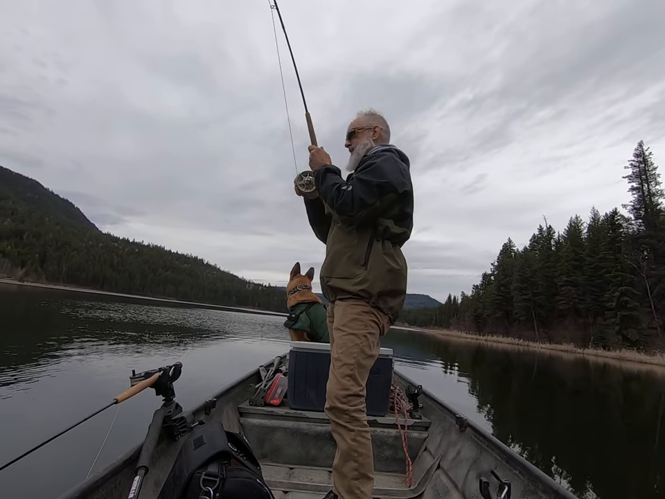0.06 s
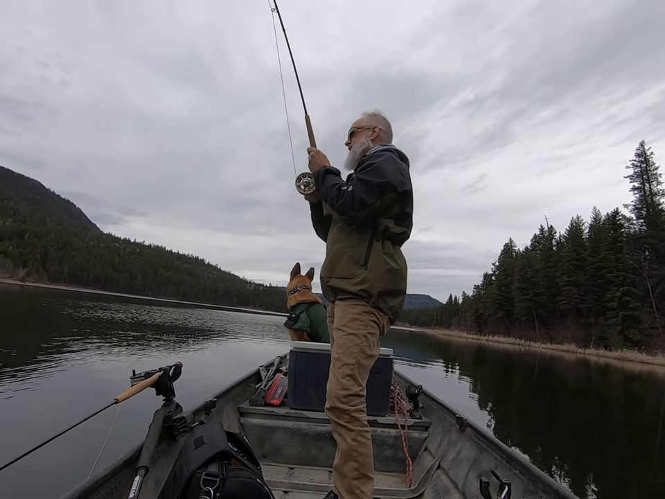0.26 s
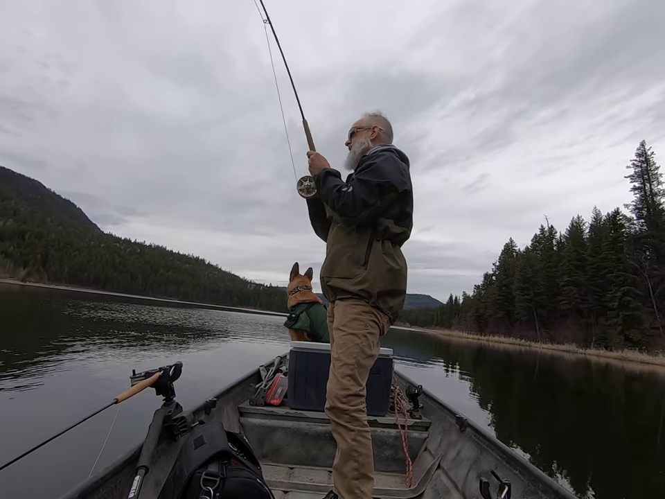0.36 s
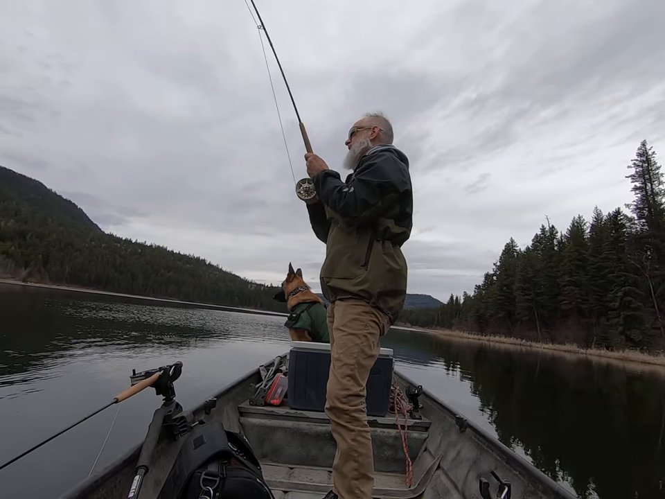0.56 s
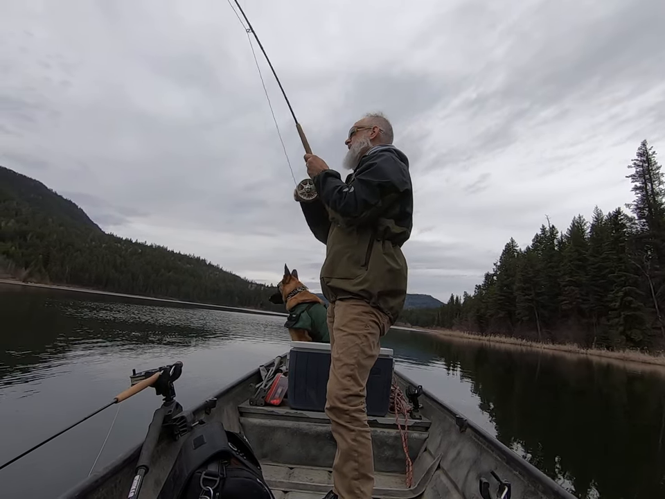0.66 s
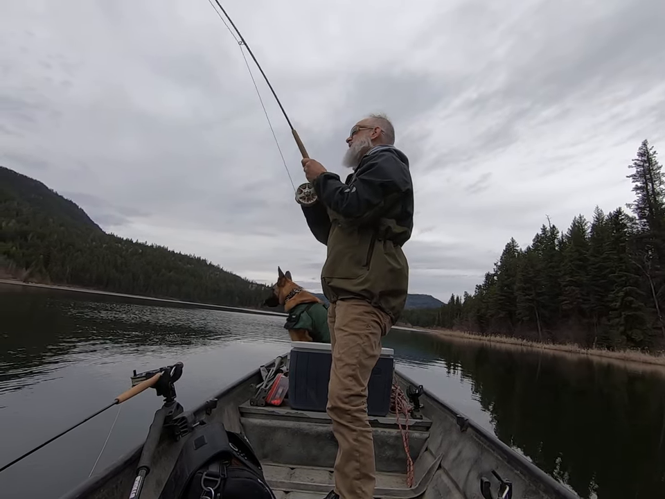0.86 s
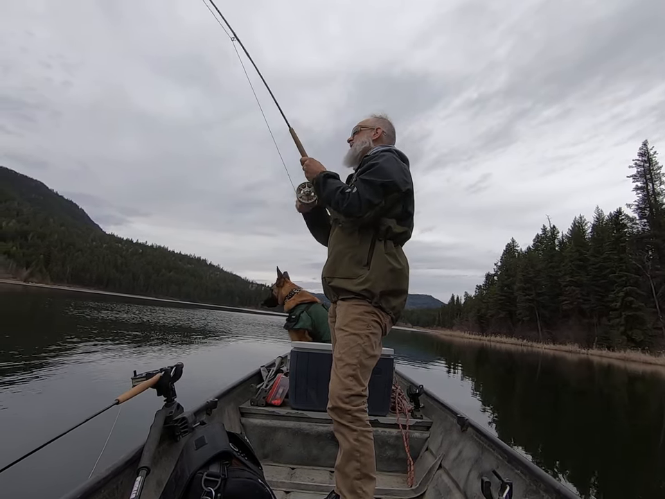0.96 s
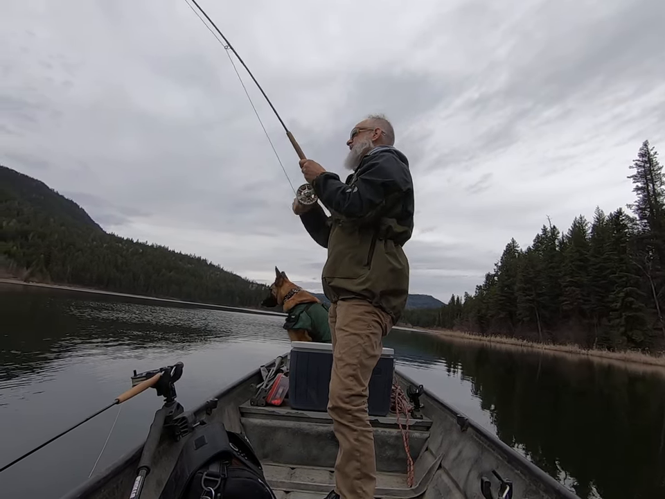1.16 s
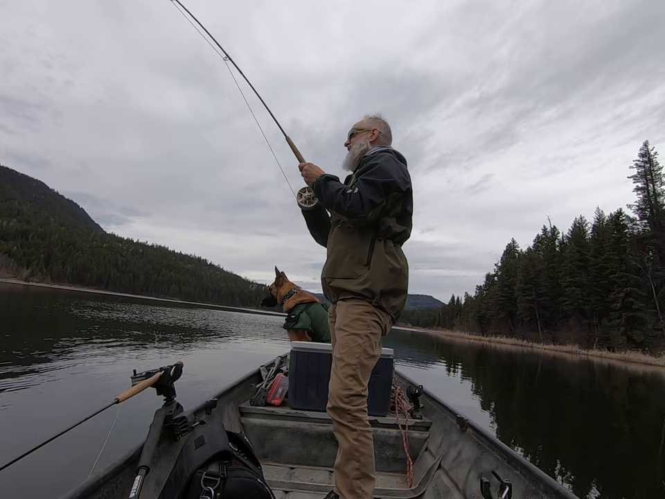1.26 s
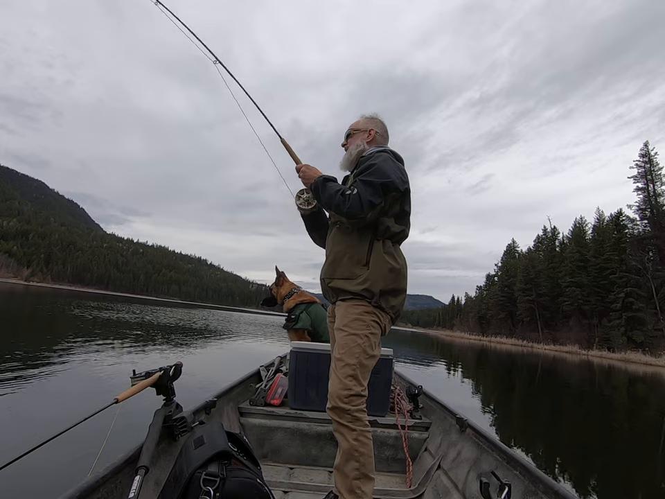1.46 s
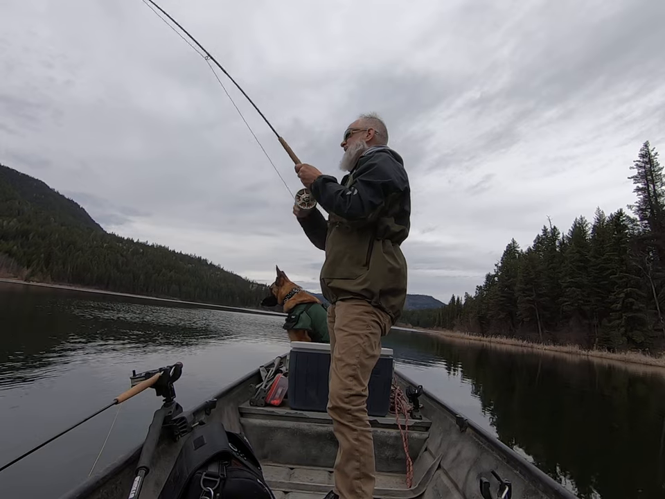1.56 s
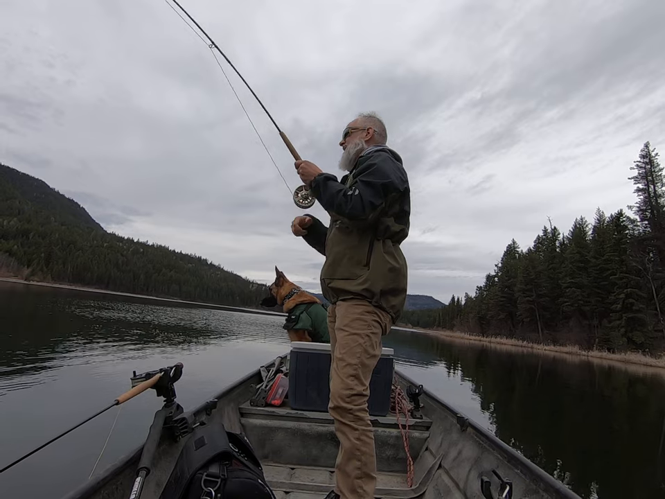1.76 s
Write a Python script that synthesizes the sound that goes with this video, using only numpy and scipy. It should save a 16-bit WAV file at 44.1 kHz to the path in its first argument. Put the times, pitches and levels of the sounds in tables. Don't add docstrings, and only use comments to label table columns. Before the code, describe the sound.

A fishing reel's click drag ratchets fast as line is pulled out on a calm lake

```python
import sys
import numpy as np
from scipy import signal
from scipy.io import wavfile
from scipy.ndimage import uniform_filter1d

SR = 44100
rng = np.random.default_rng(int(sys.argv[2]) if len(sys.argv) > 2 else 0)


def digitize_waveform(pressure):
    field = np.atleast_2d(pressure).T
    bounded = np.clip(field, -1, 1)
    quanta = np.round(bounded * 32767).astype(np.int16)
    wavfile.write(sys.argv[1], SR, quanta)


def makeup_ratio(level_db):
    decades = np.asarray(level_db, float) / 20
    return 10 ** decades


N = 79380
START_S, STOP_S = .2136, 1.546
DRIFT = .022
NO_SWELL_S = 1e-6

# start in
# seconds, level in dB against a full click, extra level of the ring in dB.
LONE_TICKS = [(.0092, -2, 0), (.0155, -14, -20), (.033, -28, -5), (.1205, -38, 10), (0.1255, -25, 0),
              (0.1445, -15, -6), (0.1597, -9, 0), (.163, -22, 8), (.18, -32, 14), (0.2, -32, 14),
              (1.387, 4.5, -5), (1.6605, -25.5, -11)]


def evened(x):
    return x / np.sqrt(np.mean(x ** 2) + 1e-20)


def follow(points, at, **ends):
    return np.interp(at, *np.transpose(points), **ends)


def read(points, hz):
    f, value = np.transpose(points)
    return np.interp(np.log(hz + 1), np.log(f + 1), value)


def band(x, low_hz, high_hz):
    edges = [low_hz, min(high_hz, .49 * SR)]
    return signal.sosfilt(signal.butter(3, edges, "band", fs=SR, output="sos"), x)


def train(times, sizes):
    out = np.zeros(N, complex)
    np.add.at(out, np.clip(np.round(times * SR).astype(int), 0, N - 1), sizes)
    return out


def ring(x, hz, t60):
    return signal.lfilter([1], [1, -np.exp((2j * np.pi * hz - np.log(1000) / t60) / SR)], x)


def resonate(x, hz, width_hz):
    turn = np.exp(2j * np.pi * np.cumsum(hz * np.ones(N)) / SR)
    r = np.exp(-np.pi * width_hz / SR)
    return 2 * (turn * signal.lfilter([(1 - r) ** 2], [1, -2 * r, r * r], x / turn)).real


def lake():
    # frequency in Hz, level in dB per Hz.
    murmur_colour = [(20, -30), (40, -1), (100, -30.5), (250, -7), (1100, -7), (3800, -12), (8000, -21),
                     (14300, -27)]
    # centre in Hz, width in Hz, level in dB.
    hull_hum = [(184, 32, -70.5), (700, 113, -75)]
    # frequency in Hz, share (1 same, -1 opposite).
    likeness = [(60, 1), (130, -0.063), (290, -0.026), (700, -0.39), (1400, -0.22), (3100, -0.66),
                (7000, -0.16), (15000, -1)]
    frames, hz = N // 256 + 5, np.fft.rfftfreq(1024, 1 / SR)
    a, b, c, d, patches = rng.standard_normal((frames, 513, 5)).T
    patches = uniform_filter1d(patches, size=10, axis=0)
    patches = evened(uniform_filter1d(patches, size=8, axis=1))
    same = np.clip(read(likeness, hz), -1, 1)[:, None]
    left = a + 1j * b
    right = same * left + np.sqrt(1 - same ** 2) * (c + 1j * d)
    shape = makeup_ratio(read(murmur_colour, hz))
    shape = shape / np.linalg.norm(shape) * makeup_ratio(-52 - 16.0)
    for centre_hz, width_hz, db in hull_hum:
        hump = np.exp(-((hz - centre_hz) / width_hz) ** 2)
        shape = np.hypot(shape, makeup_ratio(db) * hump / np.linalg.norm(hump))
    spectrum = np.array([left, right]) * shape[:, None] * makeup_ratio(1.42 * patches)
    sound = signal.istft(spectrum, nperseg=1024, noverlap=768)[1][:, :N]
    return evened(sound) * np.linalg.norm(shape)


def hull(x):
    slots = np.arange(60, SR // 3, 20)
    at = slots + rng.integers(0, 20, (3, len(slots)))
    taps, t = np.zeros((3, SR // 3 + 20)), np.arange(SR // 3 + 20) / SR
    np.put_along_axis(taps, at, rng.choice([-1., 1.], at.shape), 1)
    shared = .82
    taps = np.sqrt(1 - shared ** 2) * taps[:2] + shared * taps[2]
    tail = 0
    for db, t60 in ((-9.5, 0.055), (-15.5, 0.15)):
        part = taps * makeup_ratio(-60 * t / t60)
        tail = tail + makeup_ratio(db) * part / np.linalg.norm(part[0])
    return signal.fftconvolve(x, tail, axes=1)[:, :N]


def knocks():
    # start in seconds, peak in dB, lowest Hz, highest Hz, seconds to die by 60 dB.
    bumps = [(0.03, -52.5, 430, 1080, 0.022), (0.046, -61.5, 500, 1080, 0.11),
             (0.16, -49.5, 636, 805, 0.024), (0.184, -46.5, 24.4, 43.2, 0.14), (0.24, -61, 230, 875, 0.37),
             (0.271, -63.5, 960, 1504, 0.17), (0.413, -49, 2060, 3300, 0.058),
             (0.781, -58.5, 604, 830, 0.049), (1.042, -53, 2010, 2590, 0.1),
             (1.105, -51.5, 360, 820, 0.054), (1.118, -56.5, 132, 660, 0.15),
             (1.388, -38, 2390, 2800, 0.028), (1.405, -58, 1500, 2070, 0.12), (1.477, -61, 700, 2560, 0.12),
             (1.49, -58, 2060, 2900, 0.26), (1.32, -58, 1140, 2720, 0.093), (1.742, -64, 593, 810, 0.068)]
    out, t = np.zeros((2, N)), np.arange(N) / SR
    for start_s, db, low_hz, high_hz, t60 in bumps:
        age = np.maximum(t - start_s, 0)
        a, b = rng.standard_normal((2, N))
        apart = .8 if high_hz < 1500 else .25
        body = evened(band(np.array([a + apart * b, a - apart * b]), low_hz, high_hz))
        soft_start = np.minimum(age * low_hz / 1.1, 1)
        out += body * soft_start * makeup_ratio(db - 60 * age / t60)
    return out


def creep():
    # time in seconds, level in dB.
    scrape_level = [
        (.115, -87),
        (.122, -63.5),
        (.155, -72),
        (0.16, -50.5),
        (.19, -62),
        (.198, -53),
        (0.214, -49),
        (.22, -87),
    ]
    a, b = rng.standard_normal((2, N))
    grain = makeup_ratio(3 * evened(uniform_filter1d(b, size=60)))
    level_db = follow(scrape_level, np.arange(N) / SR, left=-150, right=-150)
    return evened(band(a * grain, 2900, 4060)) * makeup_ratio(level_db)


def round_turn(pattern, tooth):
    angle = 2 * np.pi * tooth / 35.5
    return sum(c * np.cos(k * angle) + s * np.sin(k * angle) for k, (c, s) in enumerate(pattern, 1))


def clicks():
    # time in seconds, teeth per second.
    spool_speed = [(0.214, 103.65), (0.2565, 153.87), (0.3506, 103.86), (0.4978, 137.68), (0.5427, 169.65),
                   (0.6012, 105.62), (0.6104, 133.89), (0.7493, 159.94), (0.8856, 158.62), (0.9286, 157.16),
                   (0.9588, 193.8), (1.0655, 140.98), (1.163, 196.51), (1.1946, 142.35), (1.3353, 164.57),
                   (1.3655, 184.55), (1.4904, 133.04), (1.54, 56.29)]
    wobble = [(.224, .425), (-.152, .235)]
    # cosine part in dB, sine part in dB.
    ring_beam = [(-1.9, 1.2), (4.4, -1.7)]
    bright_beam = [(1.7, 2.1), (1.4, -1.1)]
    top_beam = [(-0.64, 0.47), (-0.16, 0.38)]
    # time in seconds, level in dB.
    freedom = [(.21, 5.5), (.26, 11), (.33, -0.5), (.41, 8), (.48, 0), (.55, 4.5), (.62, 2), (.7, 5.5),
               (.78, 1), (.86, 3), (.95, 4.5), (1.04, 3), (1.12, 4.5), (1.2, 4.5), (1.28, 4), (1.36, 7),
               (1.45, 5.5), (1.54, 7)]
    t = np.arange(START_S, STOP_S, 1 / SR)
    passed = np.cumsum(follow(spool_speed, t + .0004)) / SR
    tooth = np.arange(int(passed[-1]) + 1)
    uneven = tooth + round_turn(wobble, tooth) - round_turn(wobble, 0)
    times = np.interp(uneven, passed, t)
    along = tooth / tooth[-1]
    ring_db = round_turn(ring_beam, tooth) + 2.1 * along + follow(freedom, times)
    bright_db = round_turn(bright_beam, tooth) + .9 * along
    times = times + .00004 * rng.standard_normal(len(times))
    tick_s, tick_db, share_db = np.transpose(LONE_TICKS)
    return (np.r_[times, tick_s],
            np.r_[ring_db, tick_db + share_db],
            np.r_[bright_db, tick_db],
            np.r_[round_turn(top_beam, tooth), tick_db - 9])


def spool(times, modes, beam_db, loose, drift, swell_s):
    # frequency in Hz, left over right in dB, left lead in radians.
    openings = [(2400, 1.3, -.5), (3400, -1.5, 0), (4800, .8, .7), (6300, 1.5, .7), (7700, -6, -.9),
                (8500, -4, 1.3), (9500, 0, -.8), (13500, 1, .2)]
    port_hz, port_db, port_lead = np.transpose(openings)
    out, t = np.zeros((2, N)), np.arange(N) / SR
    run = slice(0, -len(LONE_TICKS))
    for hz, db, t60 in modes:
        a, b, c, d = rng.standard_normal((len(times), 4)).T
        size = 4 * makeup_ratio(db + beam_db + .7 * a) * np.exp(1j * loose * b)
        bounce = size * makeup_ratio(-10) * np.exp(1j * loose * d)
        drive = train(times, size) + train(times + .0014 * makeup_ratio(1.4 * c), bounce)
        slide = drift * np.interp(t, times[run], evened(uniform_filter1d(c[run], size=7)))
        turn = np.exp(2j * np.pi * np.cumsum(hz * (1 + slide)) / SR)
        z = ring(drive / turn, 0, t60)
        z = turn * ring(z, 0, swell_s * np.log(1000)) / max(swell_s * SR, 1)
        pan_db, lead = np.interp(hz, port_hz, port_db), np.interp(hz, port_hz, port_lead)
        out += [(z * makeup_ratio(pan_db / 2) * np.exp(1j * lead)).imag, z.imag * makeup_ratio(-pan_db / 2)]
    return out


def spool_rings(times, ring_db, bright_db, top_db):
    # frequency in Hz, level in dB, seconds to die by 60 dB.
    main_tones = [(3050, -66, .016), (3300, -61, 0.017), (3560, -59.5, .016), (3700, -54.5, 0.022),
                  (3770, -56, 0.019), (4200, -66, 0.012)]
    bright_tones = [(4670, -56, 0.0048), (5493, -57, 0.0072), (6272, -61, 0.022), (7280, -69, 0.018),
                    (7756, -59, 0.014), (8560, -57.5, 0.0098), (9473, -62, 0.0074)]
    top_tones = [(12800, -79, 0.0078), (13200, -60.5, 0.0013)]
    main = spool(times, main_tones, ring_db, .2, .004, .0013)
    bright = band(spool(times, bright_tones, bright_db, .35, DRIFT, NO_SWELL_S), 1000, 10500)
    return main + bright + spool(times, top_tones, top_db, .5, 2 * DRIFT, NO_SWELL_S)


def crack(spikes, burst, noise):
    spike = np.array([spikes, np.roll(spikes, 2)])
    sound = makeup_ratio(-45) * burst * (noise[:2] * 2.08 + noise[2]) + makeup_ratio(-35) * spike
    return band(band(sound, 3000, 7730), 3000, 10200)


def fizz(top, noise):
    steady = 0.72 * uniform_filter1d(top, size=600)
    return makeup_ratio(-60) * band((top + steady) * (2.1 * noise[:2] + noise[2]), 11660, 15300)


def air_gap(burst, noise):
    # time in seconds, resonance in Hz, level in dB.
    hand_gap = [(.21, 3070, -67), (.3, 2964, -46.5), (.44, 2900, -56), (.505, 2360, -64),
                (.56, 3400, -49.5), (0.599, 2350, -52.5), (.68, 2920, -50), (.74, 2810, -58),
                (0.796, 3040, -51), (0.822, 3560, -40), (0.861, 2900, -48), (.96, 3355, -51),
                (1.051, 2700, -60.5), (1.139, 3265, -52.5), (1.2, 2400, -63.5), (1.252, 3410, -44.5),
                (1.328, 2990, -47.5), (1.55, 3370, -56)]
    t, (s, hz, db) = np.arange(N) / SR, np.transpose(hand_gap)
    breath = (burst + uniform_filter1d(burst, size=3000)) * noise[2]
    gap = evened(resonate(breath, np.interp(t, s, hz), 190))
    patches = uniform_filter1d(uniform_filter1d(noise[0], size=500), size=500)
    patchy_db = 3.5 * np.tanh(evened(patches))
    running = (t > START_S) * np.exp(-np.maximum(t - STOP_S, 0) / 0.027)
    side_db = [[-.7], [.7]]
    return gap * makeup_ratio(np.interp(t, s, db) - 6 + patchy_db + side_db) * running


def reel():
    times, ring_db, bright_db, top_db = clicks()
    spikes, top_spikes = train(times, makeup_ratio(bright_db)).real, train(times, makeup_ratio(top_db)).real
    snap_s = 0.0016
    burst, top = signal.lfilter([1], [1, -np.exp(-1 / (snap_s * SR))], [spikes, top_spikes])
    noise = rng.standard_normal((3, N))
    metal = spool_rings(times, ring_db, bright_db, top_db)
    metal = metal + crack(spikes, burst, noise) + fizz(top, noise)
    low_hz = 2250
    return band(band(metal, low_hz, 32000), low_hz, 15200) + air_gap(burst, noise)


def scene():
    near = reel() + creep() + knocks()
    return near + hull(near) + lake()


def roll_off(x):
    return signal.sosfilt(signal.butter(12, 15940, fs=SR, output="sos"), x)


def record(dry):
    return roll_off(dry)


dry = scene()
out = record(dry)
digitize_waveform(out)
```